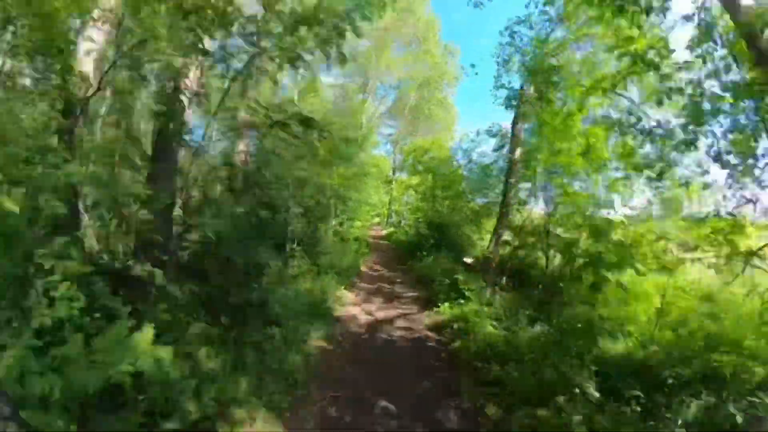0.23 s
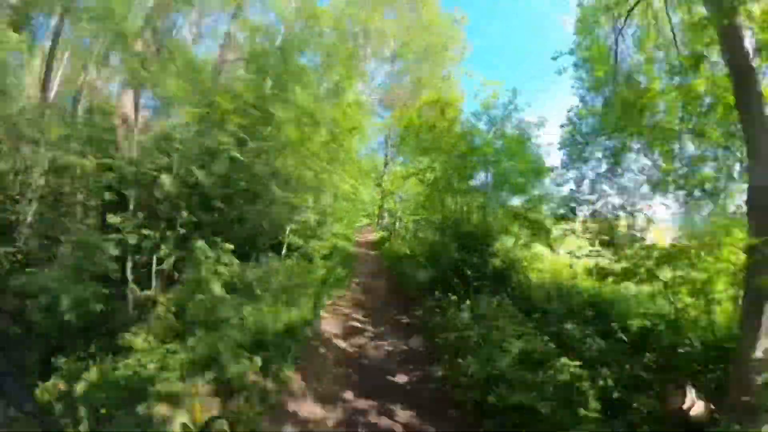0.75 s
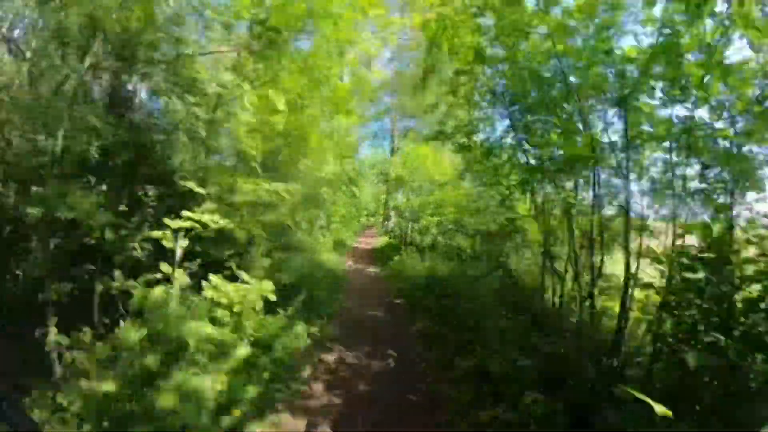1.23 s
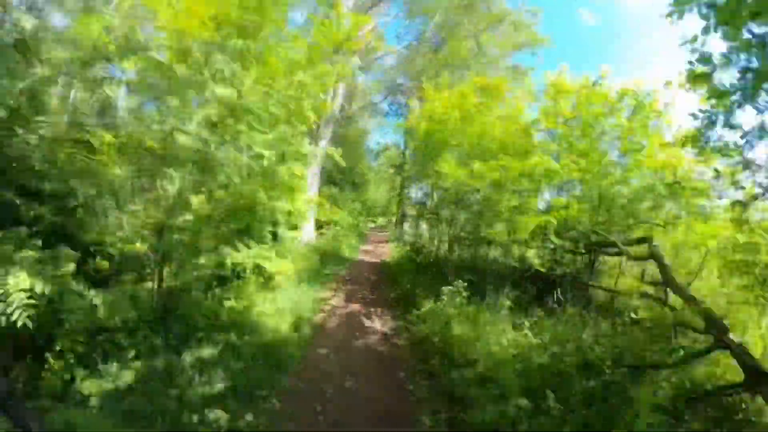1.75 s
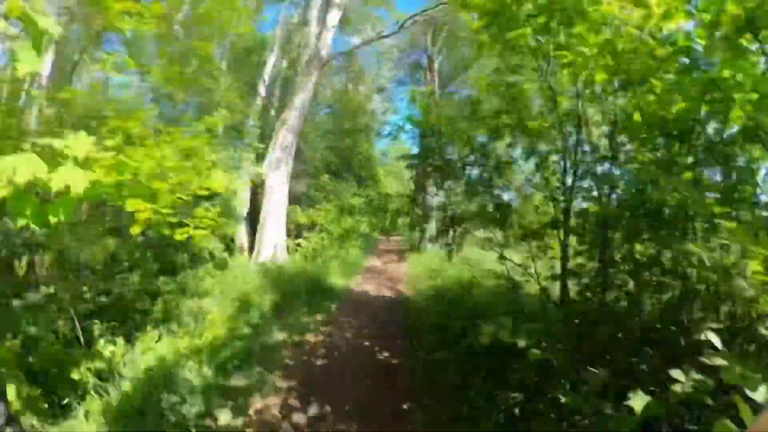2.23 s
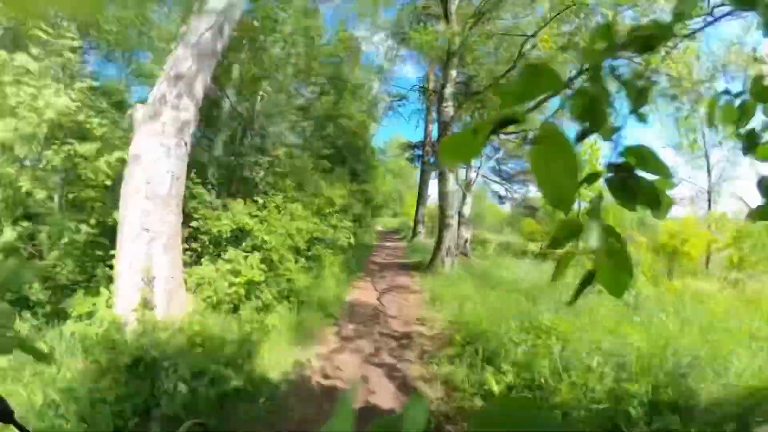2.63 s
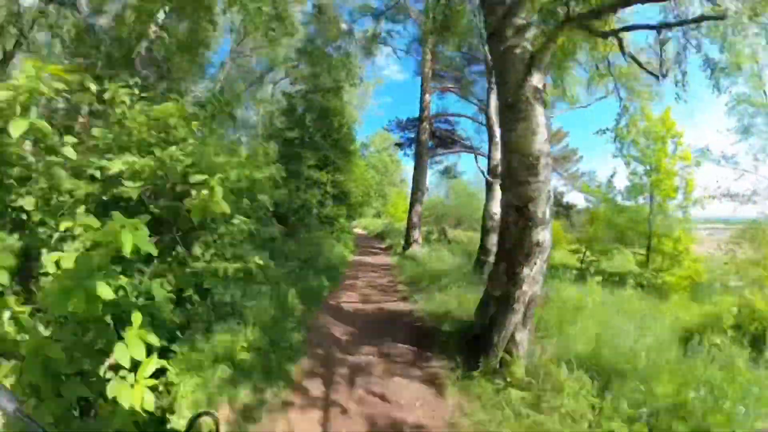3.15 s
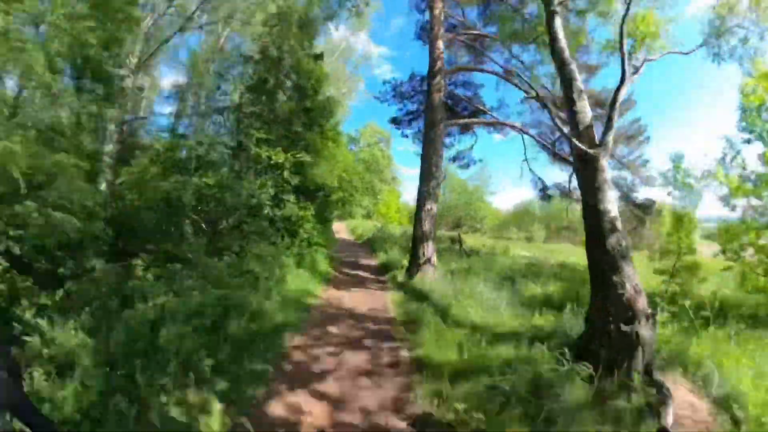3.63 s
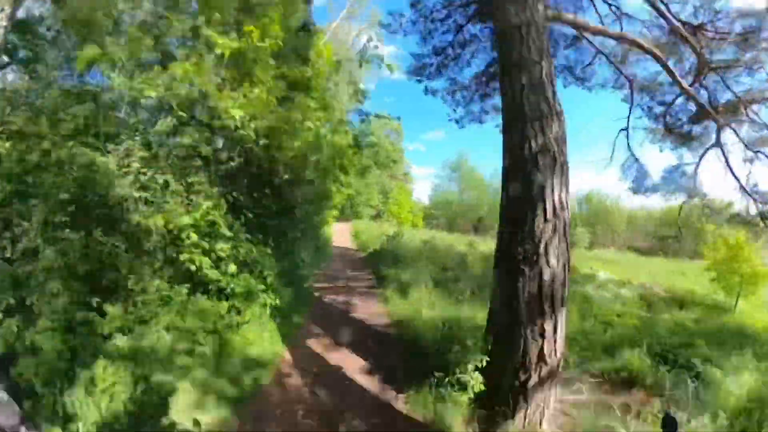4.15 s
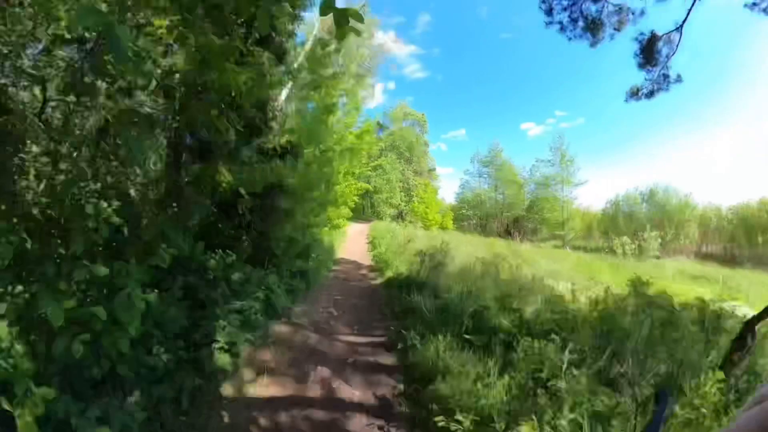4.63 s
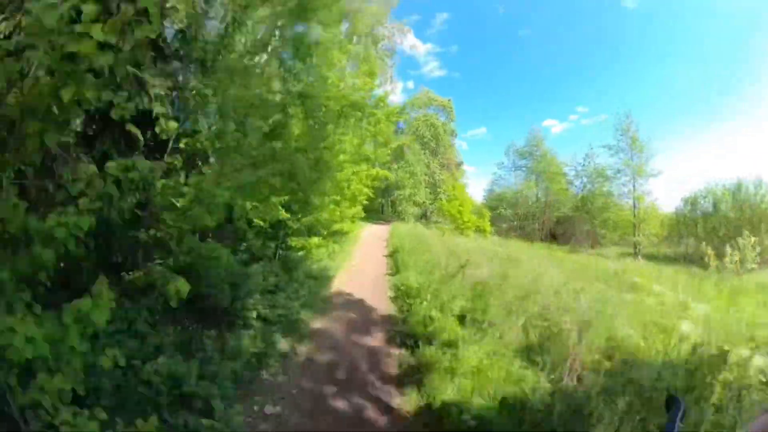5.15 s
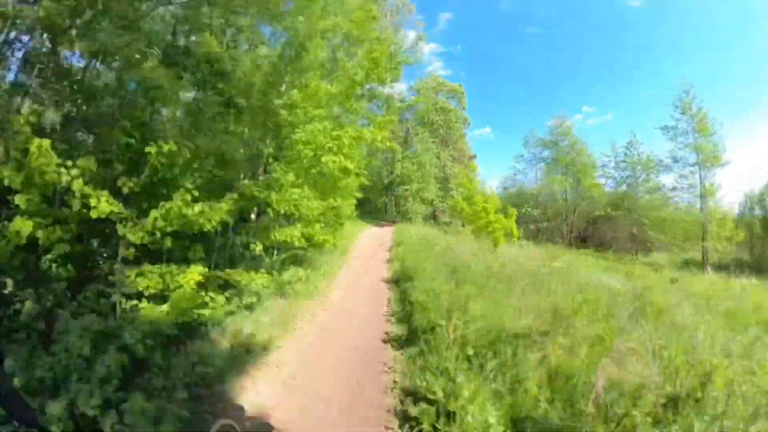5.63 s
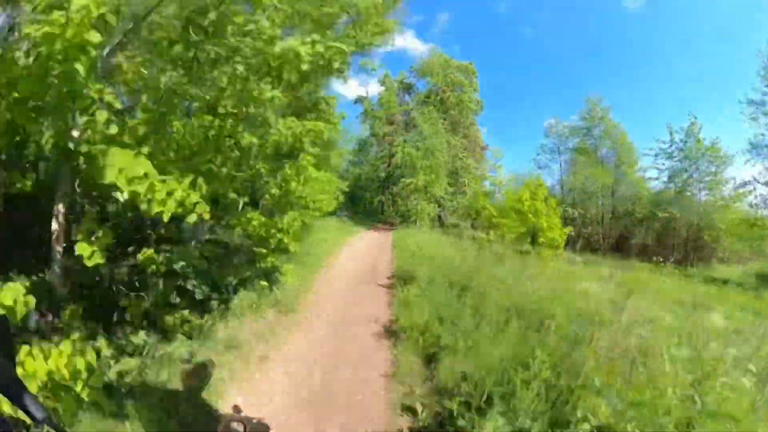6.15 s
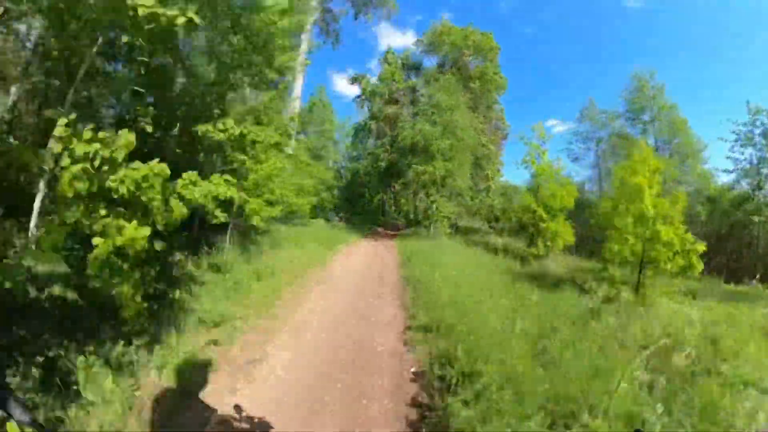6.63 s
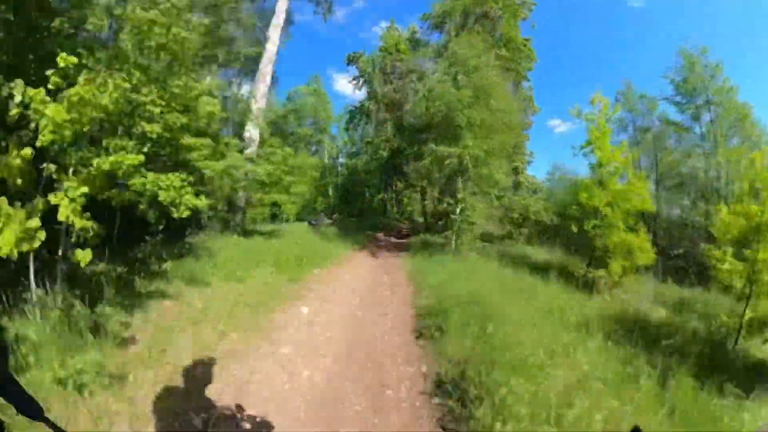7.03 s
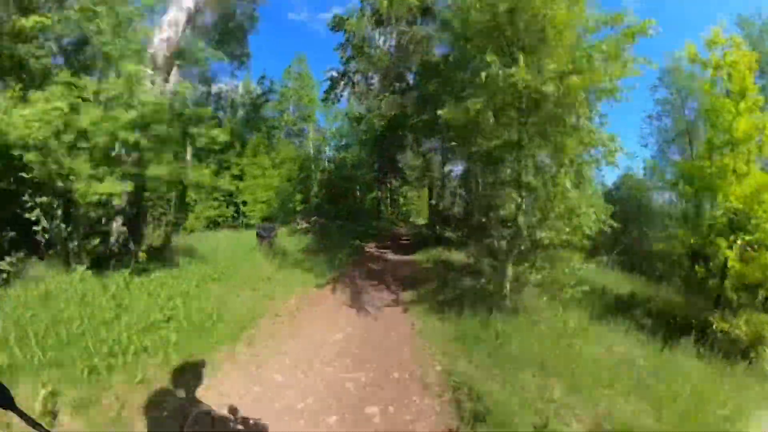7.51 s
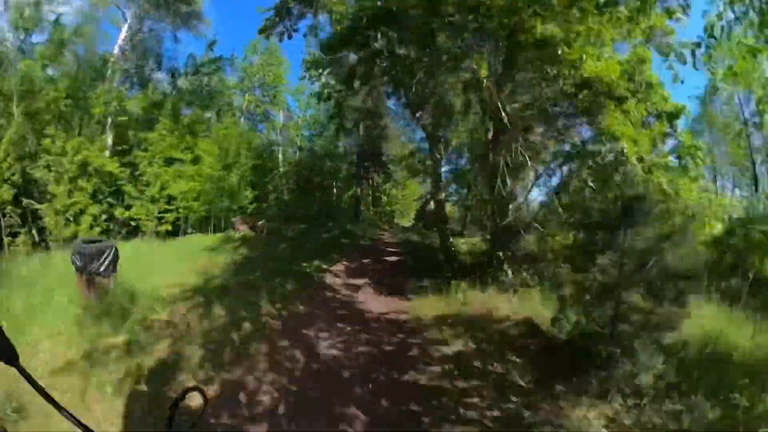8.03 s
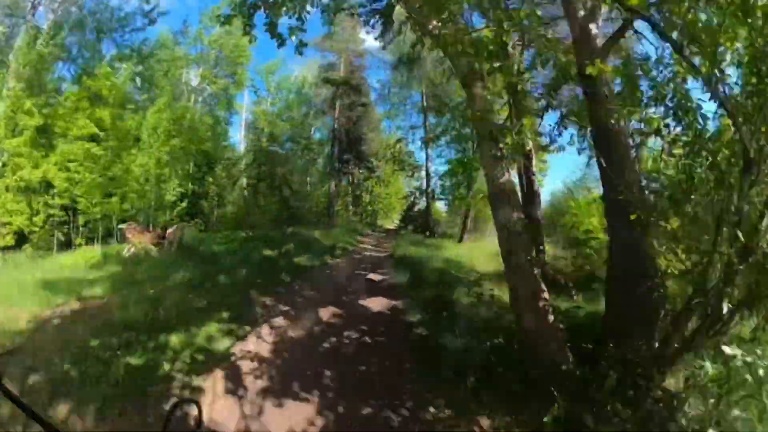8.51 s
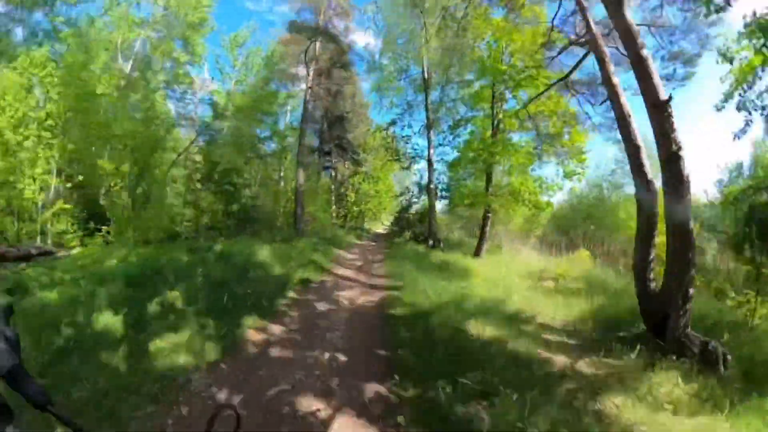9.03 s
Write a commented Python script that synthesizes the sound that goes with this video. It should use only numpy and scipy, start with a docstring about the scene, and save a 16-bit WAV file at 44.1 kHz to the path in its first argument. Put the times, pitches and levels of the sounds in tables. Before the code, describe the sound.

A heavy electric scooter rolls over a bumpy forest track, recorded close by a covered microphone attached to it, bassy and slightly dull. From 0 s an irregular deep rumble shakes the mount, with a soft low motor hum, faint rolling hiss, brake disc rubbing and pinging, dry knocks and small bright ticks. Around 0.9 s one faint rising bird whistle passes. Leaves lightly brush the microphone at 1.7 and 2.3 s; from 2.45 to 2.75 s a thick branch whips it with loud crackling slaps, hollow knocks and a brief ringing tone. About 3 s is calmer. From 4 to 5 s metallic knocks crowd together. The hum is strongest near 6 s. From 6.7 to about 8 s the ride is roughest, with heavy hollow thumps and dense rattling, easing slightly in bursts, before the rumble swells and a short click ends it near 9.25 s.

```python
"""A heavy electric scooter on a rough forest track, heard close up from a small camera fixed to it.
From the start the mount rumbles, the hub motor hums, the brake disc rubs and pings, and loose parts rattle,
knock and tick. A bird whistles once, faintly, just before 1 s. Leaves brush the microphone from 1.6 s and a
thick branch whips it and knocks the camera at about 2.5 s. From 4 s the knocks crowd; the motor hums loudest
near 6 s; from 6.7 s the ride is roughest, with heavy thumps; the rumble swells and a short click ends it."""
import sys
import numpy as np
from scipy import signal
from scipy.fft import rfft, irfft, next_fast_len
from scipy.io import wavfile
from scipy.ndimage import uniform_filter1d

SR = 44100
rng = np.random.default_rng(int(sys.argv[2]) if len(sys.argv) > 2 else 0)


def dump_mix(stems):
    """Bounce the given channels to the path in sys.argv[1] as a 16-bit WAV at rate SR."""
    frames = np.atleast_2d(stems).T  # one column per channel
    limited = np.clip(frames, -1, 1)  # hard clip at full scale
    pcm = np.round(limited * 32767).astype(np.int16)
    wavfile.write(sys.argv[1], SR, pcm)


N = 408807

# Levels are those of each source ahead of the microphone; mode and spectrum levels are relative.
# roughness of the track between bumps:
# time_s, shake_db (mount), thud_db (tyres), boom_db (deck), rattle_db (frame), grit_db
TRACK_ROUGHNESS = [(0, -23.5, -35.5, -47, -61, -67), (0.5, -30, -46.5, -45, -58, -66),
                   (1, -27.5, -34, -43.5, -62, -68.5), (1.5, -31, -49.5, -46, -56.5, -65),
                   (2, -31.5, -39, -45.5, -62.5, -69), (2.4, -23.5, -38, -48, -54, -61.5),
                   (2.85, -35, -43, -50.5, -61.5, -67), (3.3, -34.5, -36, -51, -60, -71.5),
                   (3.8, -25.5, -38, -44.5, -64.5, -73.5), (4.15, -28, -31.5, -44, -49.5, -59.5),
                   (4.45, -27.5, -31.5, -44.5, -51.5, -66), (4.8, -26.5, -36.5, -47.5, -53, -63),
                   (5.2, -29, -41.5, -46, -59.5, -68), (5.6, -29, -39, -45.5, -56.5, -64.5),
                   (6, -28.5, -34, -34.5, -54, -63.5), (6.2, -24.5, -31.5, -44, -51.5, -60.5),
                   (6.4, -23.5, -35, -45, -52, -57.5), (6.8, -21, -32, -44, -49.5, -60),
                   (7.2, -27, -32, -37.5, -51, -66), (7.45, -22, -28, -35.5, -51, -56.5),
                   (7.6, -27, -35.5, -44.5, -55, -66.5), (7.95, -27.5, -36, -42, -53, -63),
                   (8.1, -27, -34, -44.5, -54.5, -63), (8.25, -31, -36, -50, -74, -69.5),
                   (8.35, -29, -30.5, -49, -65, -66), (8.5, -32, -31.5, -45, -63, -64),
                   (8.7, -28, -36.5, -45, -60.5, -63.5), (8.93, -26, -31, -47.5, -64, -68),
                   (9.07, -24.5, -32, -51, -61, -70), (9.27, -15.5, -29.5, -51, -44, -57)]
# lurches that set the mount swinging: peak_s, length_s, level_db
MOUNT_LURCHES = [(0.15, 0.1, -20.5), (0.332, 0.017, -14.5), (0.525, 0.062, -20), (0.705, 0.075, -21.5),
                 (0.962, 0.056, -23), (1.032, 0.054, -19), (1.173, 0.04, -16.5), (1.377, 0.065, -23),
                 (1.638, 0.037, -22), (1.777, 0.039, -15), (2.014, 0.17, -20), (2.24, 0.04, -25.5),
                 (2.406, 0.025, -20.5), (2.51, 0.05, -16), (2.662, 0.11, -17.5), (2.898, 0.095, -25),
                 (2.994, 0.029, -21), (3.078, 0.022, -20), (3.197, 0.055, -18.5), (3.345, 0.064, -20.5),
                 (3.512, 0.13, -20.5), (3.743, 0.049, -26.5), (3.865, 0.031, -20), (4.03, 0.055, -23.5),
                 (4.145, 0.053, -14.5), (4.3, 0.095, -16.5), (4.439, 0.022, -15.5), (4.698, 0.14, -21.5),
                 (4.852, 0.21, -25), (5.023, 0.034, -21), (5.141, 0.049, -21.5), (5.377, 0.029, -21.5),
                 (5.504, 0.076, -20.5), (5.804, 0.076, -23), (5.896, 0.025, -18), (6.036, 0.065, -21.5),
                 (6.15, 0.029, -23), (6.363, 0.048, -22.5), (6.5, 0.03, -23), (6.85, 0.3, -21.5),
                 (7.014, 0.044, -16), (7.15, 0.17, -18), (7.244, 0.039, -21), (7.44, 0.05, -23.5),
                 (7.592, 0.061, -17.5), (7.735, 0.048, -26.5), (7.832, 0.084, -17), (7.976, 0.033, -17.5),
                 (8.06, 0.092, -20), (8.177, 0.026, -20), (8.409, 0.063, -16.5), (8.622, 0.019, -21.5),
                 (8.709, 0.04, -25), (8.817, 0.038, -11.5), (9.017, 0.03, -14.5), (9.187, 0.025, -16.5)]
# bumps, roots and stones under the wheels: peak_s, length_s, rattle_db, grit_db
WHEEL_BUMPS = [(0.097, 0.055, -53, -67), (0.236, 0.072, -50, -58.5), (0.571, 0.013, -51, -73),
               (0.728, 0.12, -58, -63.5), (0.978, 0.037, -53.5, -68), (1.084, 0.026, -56, -66),
               (1.182, 0.075, -47, -57), (1.34, 0.026, -49.5, -58), (1.403, 0.045, -51.5, -57.5),
               (1.706, 0.054, -46.5, -68), (1.805, 0.047, -48, -68), (1.956, 0.087, -55.5, -64),
               (2.054, 0.036, -56, -67), (2.225, 0.032, -64, -64), (2.334, 0.026, -61, -74),
               (2.914, 0.053, -58, -68), (3.178, 0.048, -53, -64), (3.264, 0.028, -57, -69),
               (3.477, 0.1, -54, -65.5), (3.67, 0.12, -55, -64), (3.852, 0.04, -48.5, -63),
               (3.973, 0.02, -47.5, -59), (4.128, 0.039, -45, -57), (4.253, 0.053, -48, -52),
               (4.337, 0.026, -43, -68), (4.464, 0.033, -42, -58.5), (4.578, 0.023, -51, -57),
               (4.677, 0.031, -57, -67), (4.735, 0.03, -47.5, -57), (4.818, 0.027, -41, -51.5),
               (4.938, 0.0095, -44, -61), (5, 0.016, -59, -61), (5.134, 0.016, -55, -69),
               (5.206, 0.014, -48, -67), (5.342, 0.018, -52, -54), (5.444, 0.03, -51.5, -58),
               (5.71, 0.041, -53, -58.5), (5.884, 0.038, -47.5, -57), (6.238, 0.043, -52, -55),
               (6.377, 0.048, -48, -63), (6.507, 0.034, -49, -61), (6.749, 0.046, -42.5, -51),
               (6.903, 0.051, -48, -59), (6.972, 0.044, -40, -58), (7.147, 0.087, -42, -55.5),
               (7.265, 0.19, -45.5, -59.5), (7.405, 0.087, -42, -58), (7.595, 0.028, -56, -55.5),
               (7.81, 0.044, -42.5, -55.5), (8.02, 0.062, -46, -55.5), (8.404, 0.046, -42, -54),
               (8.566, 0.031, -50.5, -64), (8.805, 0.07, -48, -57), (8.87, 0.033, -51.5, -61),
               (8.994, 0.065, -47.5, -59.5), (9.133, 0.058, -41.5, -51.5)]
# hollow thumps of tyres and deck, and of the branch knocking the camera near 2.5 s:
# peak_s, peak_db, pitch_hz, t60_s
HOLLOW_THUMPS = [(0.108, -21, 119, 0.045), (0.735, -35, 115, 0.11), (0.787, -35.5, 270, 0.12),
                 (1.14, -35, 227, 0.046), (1.354, -32, 116.8, 0.13), (1.35, -33, 297, 0.019),
                 (1.418, -25, 120, 0.084), (1.708, -30, 109, 0.12), (1.743, -40, 240, 0.064),
                 (2.089, -26.5, 113, 0.099), (2.236, -21.5, 119, 0.092), (2.479, -14.5, 129, 0.19),
                 (2.495, -13, 86.6, 0.18), (2.615, -14, 122, 0.113), (2.67, -15.5, 139, 0.22),
                 (3.166, -26.5, 110, 0.087), (3.449, -22.5, 123, 0.037), (3.932, -32, 98, 0.144),
                 (3.976, -23, 105, 0.089), (4.108, -25, 124, 0.116), (4.239, -27.5, 250, 0.052),
                 (4.289, -33, 261, 0.057), (4.45, -31, 306, 0.037), (4.59, -29, 358.4, 0.059),
                 (4.735, -31.5, 270, 0.049), (4.818, -21.5, 112, 0.35), (4.82, -23.5, 342, 0.03),
                 (5.011, -33, 342, 0.049), (5.203, -36, 119.2, 0.13), (5.889, -22.5, 114.7, 0.067),
                 (5.897, -29, 237, 0.07), (6.02, -30.5, 218, 0.065), (6.105, -26.5, 210, 0.056),
                 (6.146, -21.5, 121, 0.08), (6.522, -24.5, 106.8, 0.088), (6.681, -27.5, 234, 0.072),
                 (6.761, -17, 108, 0.075), (6.862, -21, 112, 0.11), (6.903, -31, 308, 0.034),
                 (6.926, -14, 101, 0.071), (6.968, -29, 292, 0.062), (7.086, -29, 243, 0.033),
                 (7.129, -17, 108, 0.16), (7.156, -26, 287, 0.052), (7.319, -19, 280, 0.029),
                 (7.382, -24, 139, 0.14), (7.385, -21.5, 312, 0.017), (7.463, -24.5, 254, 0.032),
                 (7.567, -18.5, 110, 0.13), (7.595, -32, 259.4, 0.043), (7.775, -14, 107.6, 0.1),
                 (7.8, -28, 335, 0.079), (8.031, -27, 322, 0.024), (8.034, -21, 111, 0.11),
                 (8.406, -25.5, 126, 0.17), (8.415, -28.5, 307, 0.057), (8.535, -25.5, 330, 0.012),
                 (8.95, -38, 241, 0.087), (9.125, -29.5, 256, 0.022), (9.18, -28, 330, 0.044)]
# resonances of the frame: centre_hz, width_hz, level_db
FRAME_MODES = [(433, 130, -0.5), (650, 340, 3), (856, 390, 0.5), (1161, 160, 2), (1416, 110, -4.5),
               (1680, 220, -4.5)]
# resonances of the hollow deck: centre_hz, width_hz, level_db
DECK_MODES = [(193.4, 73, 0.5), (250.5, 84.6, 1.5), (343.5, 104, -4), (414.5, 98, -10)]
# spectrum of the grit: frequency_hz, density_db (per Hz)
GRIT_SPECTRUM = [(1180, -4.5), (2000, -6.5), (3800, -2), (5500, -4.5), (7850, -11.5), (10800, -18.5),
                 (14000, -49.5)]
# spectrum of the steady rolling hiss: frequency_hz, density_db (per Hz)
ROLL_SPECTRUM = [(240, -32.5), (400, -11.5), (488, 0.5), (926, -8), (1180, -3.5), (2370, -28), (5490, -29),
                 (7830, -41), (12000, -40), (15600, -83.5), (22000, -120)]
# knocks of loose parts on the frame:
# start_s, peak_db (snap and ring together, without the chatter), pitch_hz
PART_KNOCKS = [(0.069, -41, 592), (0.119, -43, 697), (0.2, -33, 676), (0.241, -39, 1160), (0.283, -41, 568),
               (0.308, -40, 643), (0.571, -42, 587), (0.672, -41, 563), (0.703, -38.5, 570),
               (0.723, -43, 805), (0.755, -43, 1200), (0.81, -42, 1180), (0.952, -41, 751),
               (1.079, -41, 832), (1.092, -41, 1200), (1.125, -40, 1090), (1.172, -37, 552),
               (1.189, -41, 1500), (1.223, -44, 614), (1.326, -37, 544), (1.389, -43, 942),
               (1.685, -41, 1160), (1.702, -39, 762), (1.734, -33.5, 1000), (1.792, -38, 568),
               (1.941, -41, 1190), (1.964, -40, 554), (2.213, -36, 1210), (2.309, -41, 1010),
               (2.328, -33.5, 1100), (3.171, -36.5, 1100), (3.184, -38, 724), (3.41, -38.5, 1160),
               (3.441, -36, 1180), (3.508, -40, 716), (3.535, -41, 770), (3.762, -44, 598),
               (3.807, -43, 552), (3.815, -39, 1130), (3.889, -41, 552), (3.937, -37, 1260),
               (3.959, -36.5, 1260), (4.054, -42, 813), (4.088, -34, 1090), (4.102, -31, 1080),
               (4.149, -40, 729), (4.171, -33, 813), (4.188, -36, 781), (4.205, -33, 810),
               (4.224, -31, 1030), (4.285, -30, 581), (4.321, -28.5, 620), (4.332, -25, 778),
               (4.361, -31, 590), (4.401, -38.5, 861), (4.436, -28, 837), (4.452, -30, 571),
               (4.464, -29, 598), (4.56, -40, 1070), (4.589, -37, 700), (4.609, -32, 770),
               (4.63, -44, 1500), (4.652, -41, 1060), (4.684, -38, 560), (4.703, -39, 565),
               (4.725, -41, 1200), (4.739, -37, 1700), (4.77, -37, 1170), (4.818, -29, 1180),
               (4.828, -32, 1500), (4.858, -35, 1300), (4.928, -38, 1250), (4.941, -38, 1100),
               (4.994, -38, 1250), (5.044, -40, 1200), (5.078, -39, 1200), (5.124, -42, 603),
               (5.142, -41, 1200), (5.317, -38, 614), (5.344, -39, 1500), (5.376, -38, 619),
               (5.432, -39, 619), (5.463, -41, 743), (5.855, -42, 803), (5.897, -36, 552),
               (6.226, -36.5, 554), (6.353, -33, 568), (6.486, -39, 1150), (6.507, -35, 573),
               (6.527, -36, 598), (6.609, -36, 622), (6.707, -38, 1210), (6.727, -41, 1380),
               (6.748, -36, 603), (6.763, -27.5, 789), (6.823, -31.5, 787), (6.853, -37, 751),
               (6.877, -39, 842), (6.908, -30.5, 1240), (6.945, -31, 754), (6.968, -31, 659),
               (6.984, -33, 1170), (7.022, -36, 744), (7.042, -37, 552), (7.114, -35, 552),
               (7.122, -28, 547), (7.132, -28, 820), (7.148, -31, 552), (7.159, -35, 837),
               (7.196, -34, 1132), (7.238, -43, 820), (7.264, -29.5, 853), (7.286, -34, 692),
               (7.312, -34, 665), (7.369, -38, 890), (7.39, -30, 678), (7.404, -32, 1120),
               (7.431, -26, 1150), (7.473, -32, 842), (7.552, -37, 587), (7.601, -38, 816),
               (7.755, -39, 654), (7.783, -29, 1150), (7.791, -33, 813), (7.809, -38, 559),
               (7.836, -30, 676), (7.862, -31.5, 729), (7.906, -36.5, 740), (7.984, -38, 807),
               (8.008, -30, 1086), (8.022, -31, 775), (8.03, -32, 643), (8.059, -37, 555),
               (8.336, -43, 633), (8.36, -29, 1150), (8.397, -28.5, 740), (8.409, -27, 638),
               (8.434, -40, 867), (8.465, -39, 1260), (8.531, -35, 580), (8.549, -41, 552),
               (8.57, -42, 800), (8.759, -30, 1190), (8.809, -35, 630), (8.838, -38, 554),
               (8.858, -38, 826), (8.898, -38, 557), (8.942, -37, 744), (8.978, -37, 720),
               (9.085, -32, 1240), (9.107, -35, 646), (9.123, -30, 1006), (9.137, -33, 597),
               (9.17, -29.5, 770), (9.193, -33, 548), (9.226, -30.5, 630)]
# leaves dragging across the microphone: two light touches, then one long brush in two consecutive lists:
# time_s, treble_db, bass_over_treble_db (the leaf function offsets both levels)
LEAF_DRAGS = [
    [(1.63, -77, 11), (1.684, -54.5, 24), (1.786, -60.5, 15), (1.796, -57.5, 4), (1.83, -53.5, 2),
     (1.85, -60, 18), (1.89, -71, 12)],
    [(2.29, -85, 37), (2.314, -52, 12), (2.322, -61, 23), (2.35, -56, 7), (2.39, -75, 40)],
    [(2.45, -62, 20), (2.464, -59, 22), (2.476, -30.5, 19.5), (2.505, -35.5, 18.5), (2.52, -44.5, 19),
     (2.552, -44, 20), (2.56, -45, 16)],
    [(2.56, -41.5, -3), (2.578, -34, -6), (2.594, -35, 22), (2.602, -33, 16.5), (2.68, -29.5, 17.5),
     (2.728, -39, 17.5), (2.79, -67.5, 26)],
]
# spectrum of the leaf rustle: frequency_hz, density_db (per Hz)
LEAF_SPECTRUM = [(240, -35), (400, -2), (438, -31), (617, -5.5), (1160, -8), (1380, -8.5), (3820, -8.5),
                 (6940, -14), (14200, -26.5)]
# slaps of single leaves: peak_s, level_db (10.5 dB over the rms it scales), t60_s, centre_hz
LEAF_SLAPS = [(2.461, -31, 0.027, 2200), (2.476, -23, 0.02, 1500), (2.48, -14, 0.015, 2700),
              (2.49, -15, 0.011, 1200), (2.4985, -18, 0.021, 3000), (2.531, -32, 0.008, 2500),
              (2.5671, -30, 0.0084, 1300), (2.574, -7.5, 0.025, 3970), (2.581, -7.5, 0.015, 5100),
              (2.605, -12, 0.046, 2300), (2.627, -12.5, 0.033, 1210), (2.658, -9, 0.025, 1150),
              (2.689, -12.5, 0.034, 1890), (2.722, -12.5, 0.013, 1200), (2.7342, -18, 0.007, 2520)]
# hub motor: time_s, pitch_hz, level_db (the last two wander around these)
MOTOR_HUM = [(0.0, 267.6, -55), (0.6, 283, -50), (1.05, 264, -57), (1.4, 270.4, -50), (1.9, 284.4, -61),
             (2.9, 263, -67.5), (3.6, 287.5, -56), (4.0, 285, -50.5), (4.4, 283, -54), (5.0, 264, -70),
             (5.38, 226, -51.5), (5.5, 243, -45.5), (5.78, 239.6, -45), (5.98, 249.3, -43),
             (6.05, 217, -40), (6.3, 221.6, -43), (6.44, 242, -46), (6.7, 256, -55), (7.13, 251.8, -55.5),
             (8.29, 236, -63), (9.27, 262, -57)]
# brake disc rubbing its pad: time_s, low_ring_db, high_modes_db
PAD_RUB = [(0.0, -70, -82), (1.06, -69, -78), (1.3, -59.5, -68), (1.62, -58, -66), (1.85, -57, -71),
           (2.0, -58, -68), (2.44, -61, -78), (2.8, -70.5, -88), (3.6, -70, -80), (4.32, -64, -82),
           (4.8, -60, -82), (5.2, -70, -90)]
# pings of the disc, and a ringing tone near 1180 Hz as the branch passes:
# peak_s, length_s, high_modes_db, low_ring_db
DISC_PINGS = [(0.098, .08, -77, -61), (0.372, .06, -68, -58), (0.53, 0.037, -81, -63),
              (0.68, .07, -76, -66), (0.766, 0.075, -72, -55.5), (1.005, 0.12, -78, -65),
              (1.174, .06, -66, -62), (1.336, .05, -64, -59), (1.53, 0.13, -63, -68),
              (2.05, 0.03, -62, -55), (2.155, .06, -61, -67), (2.24, 0.057, -69, -53.5),
              (2.648, 0.063, -70, -34), (2.926, 0.042, -76, -60), (3.183, 0.056, -66, -57),
              (3.27, .04, -71, -56), (3.485, 0.054, -63.5, -57), (3.668, 0.064, -66, -51),
              (3.842, 0.044, -80, -52), (3.967, 0.053, -74, -52.5), (4.25, 0.066, -68, -49),
              (4.792, .05, -72, -49), (6.733, 0.038, -62, -45), (6.859, .03, -64, -62),
              (6.94, .02, -58, -53), (7.368, .03, -64, -60), (7.43, .03, -61, -50), (7.48, .03, -62, -65),
              (7.82, .03, -58, -55), (7.97, .04, -63, -65), (8.798, 0.055, -69, -53), (8.87, .04, -72, -62)]
# low ring of the disc: centre_hz, width_hz, level_db
DISC_LOW_MODES = [(1172, 37, 0.5), (1112, 60, -10.5), (1246, 70, -10)]
# high modes of the disc: centre_hz, width_hz, level_db
DISC_HIGH_MODES = [(3660, 70, -4), (3950, 80, -6), (4440, 130, -10), (5490, 70, 2), (5570, 150, -2),
                   (6470, 160, -6), (7750, 250, -7)]
# bright ticks of grit and small parts, and a last short click at the end:
# time_s (peak 3 ms later), level_db (9.5 dB over the rms it scales), centre_hz, t60_s
BRIGHT_TICKS = [(0.2014, -44, 4530, 0.04), (0.2395, -34.5, 5050, 0.022), (0.4529, -53, 3110, 0.04),
                (1.141, -37.5, 4700, 0.033), (1.189, -43, 3000, 0.05), (1.389, -44, 2700, 0.06),
                (1.6591, -43, 4080, 0.032), (1.696, -38, 3200, 0.034), (1.734, -37, 3080, 0.037),
                (1.9624, -50, 3700, 0.043), (2.217, -42, 4680, 0.087), (2.3107, -36.5, 3520, 0.044),
                (2.4603, -40, 3430, 0.04), (3.825, -63, 3270, 0.049), (3.862, -54, 7500, 0.04),
                (3.9304, -49, 3715, 0.047), (4.055, -50, 5000, 0.04), (4.1016, -39.5, 3100, 0.031),
                (4.1702, -40, 3170, 0.044), (4.222, -34.5, 4860, 0.053), (4.3687, -49, 3420, 0.04),
                (4.4616, -44, 3164, 0.044), (4.526, -39, 4460, 0.032), (4.57, -48, 2900, 0.05),
                (4.63, -49, 3300, 0.03), (4.6775, -37.5, 4860, 0.035), (4.728, -49, 5000, 0.06),
                (4.765, -46, 5500, 0.04), (4.7858, -42, 3420, 0.04), (4.8133, -34.5, 5500, 0.04),
                (4.8554, -42, 3500, 0.036), (4.9295, -63, 4200, 0.036), (4.9864, -61, 4570, 0.025),
                (5.0746, -46, 3580, 0.033), (5.14, -53, 3500, 0.03), (5.3147, -41, 3960, 0.04),
                (5.34, -40.5, 4820, 0.034), (5.421, -43, 3970, 0.053), (5.6758, -51, 3200, 0.037),
                (5.6947, -45, 3360, 0.073), (5.794, -44, 4000, 0.077), (5.8768, -41, 4270, 0.042),
                (6.0764, -41.5, 4510, 0.042), (6.225, -31, 5186, 0.029), (6.5122, -40.5, 4928, 0.059),
                (6.729, -34, 2930, 0.049), (6.8565, -42.5, 4890, 0.065), (6.9065, -43, 3510, 0.036),
                (6.9359, -47, 3600, 0.044), (6.9777, -36, 4100, 0.048), (7.0868, -47, 3480, 0.034),
                (7.134, -45, 3520, 0.043), (7.1739, -52, 3570, 0.034), (7.2607, -55, 3090, 0.04),
                (7.2881, -43, 4470, 0.04), (7.3178, -43, 3340, 0.06), (7.361, -39.5, 4480, 0.051),
                (7.4353, -39, 4200, 0.036), (7.77, -59, 3422, 0.037), (7.8116, -39, 6200, 0.037),
                (8.001, -36.5, 4400, 0.045), (8.0292, -38, 4050, 0.041), (8.365, -41, 3180, 0.038),
                (8.415, -41, 4000, 0.07), (8.6803, -46.5, 4870, 0.045), (8.7668, -41, 3560, 0.06),
                (8.885, -49, 3500, 0.04), (8.949, -39, 5200, 0.043), (9.02, -45.5, 4000, 0.05),
                (9.089, -39, 3590, 0.039), (9.1768, -42, 3370, 0.033), (9.227, -41, 3620, 0.042),
                (9.2547, -33.5, 5200, 0.017)]
# bird whistle: time_s, pitch_hz, level_db (the last two waver around these)
BIRD_WHISTLE = [(0.82, 3480, -78), (0.84, 3620, -71), (0.855, 3760, -67), (0.875, 3900, -71),
                (0.893, 4180, -68), (0.912, 4430, -67), (0.94, 4540, -72), (0.99, 4560, -76),
                (1.03, 4560, -80)]

RISE_SHARE = 0.46  # part of a swell's length that lies before its peak
THUD_FLICKER_DB, BOOM_FLICKER_DB = 4.5, 2
BOOM_OVER_DB = 2  # the deck over the rattle of the same bump
ROLL_DB = -56.5  # rolling hiss
SAND_SHARE = 0.4  # power share of fine sand in the grit
SNAP_HZ, SNAP_WIDTH_HZ, SNAP_SHARE = 1120, 750, 0.17  # the dry contact in front of the frame's ring
PART_CYCLES, PART_SHARE = 2.8, 0.79  # sharpness and share of the loose part's own ring
SLAP_RISE_S = 0.0034
TICK_RING_DB = -18.5  # disc ring in a tick, relative to its hiss
MIC_HZ, TOP_HZ = 7700, 14300  # where the covered microphone dulls, where the camera cuts


def undb(db):
    """Decibels to gain."""
    return 10 ** (np.asarray(db) / 20)


def unit(x):
    """Scale to rms 1."""
    return x / np.sqrt(np.mean(x ** 2))


def curves(*tables):
    """Columns of (time_s, value, ..) rows, interpolated to one value a sample."""
    s, *columns = np.vstack(tables).T
    return [np.interp(np.arange(N) / SR, s, column) for column in columns]


def between(first, last, fade_s):
    """1 from the first row of one table to the last row of another, fading to 0 outside."""
    start, end = first[0][0], last[-1][0]
    return np.interp(np.arange(N) / SR, [start - fade_s, start, end, end + fade_s], [0, 1, 1, 0])


def band(x, hz, width_hz):
    """A two-pole resonance with gain 1 at its centre."""
    return signal.lfilter(*signal.iirpeak(hz, hz / width_hz, SR), x)


def ring(x, modes):
    """Resonances of one body; neighbours alternate in sign."""
    return sum((-1) ** k * undb(db) * band(x, hz, width_hz) for k, (hz, width_hz, db) in enumerate(modes))


def colour(x, spectrum):
    """Shape by a spectrum of (Hz, dB) points, straight on a log frequency axis."""
    hz, db = np.transpose(spectrum)
    size = next_fast_len(N)
    f = np.maximum(np.fft.rfftfreq(size, 1 / SR), 1)
    gain = undb(np.interp(np.log(f), np.log(hz), db))
    return irfft(rfft(x, size) * gain, size)[:N]


def walk(rate):
    """Random levels held 1 / rate s and slewed twice; rms 1."""
    k = int(SR / rate)
    steps = np.repeat(rng.standard_normal(N // k + 1), k)
    return unit(uniform_filter1d(uniform_filter1d(steps, k), k)[:N])


def grains(rate, spread_db):
    """Scattered contacts, rate a second, most small and a few large."""
    hit = rng.random(N) < rate / SR
    return hit * rng.standard_normal(N) * undb(spread_db * rng.exponential(size=N))


def even(x, window_s):
    """Noise whose chance swells over window_s are levelled, so that a curve sets its strength."""
    k = int(window_s * SR)
    power = uniform_filter1d(uniform_filter1d(x ** 2, k), k)
    return unit(x / np.sqrt(power))


def blow(size, t60_s, rise_s):
    """Envelope of one blow: a straight rise to 1, then an exponential fall."""
    t = np.arange(size) / SR
    fall = np.exp(-np.log(1000) * np.maximum(t - rise_s, 0) / t60_s)
    return np.minimum(t / rise_s, 1) * fall


def swells(peak_s, length_s, db):
    """Power of bell-shaped swells, 3 dB down after the rising and falling parts of their length."""
    power, t = np.zeros(N), np.arange(N) / SR
    for peak, span, gain in zip(peak_s, length_s, undb(db)):
        near = slice(max(int((peak - 4 * span) * SR), 0), int((peak + 4 * span) * SR))
        d = t[near] - peak
        half_s = span * np.where(d < 0, RISE_SHARE, 1 - RISE_SHARE)
        power[near] += gain ** 2 * 0.5 ** ((d / half_s) ** 2)
    return power


def jolted(steady_db, peak_s, length_s, db):
    """Gain of a steady level with swells on top; their powers add."""
    return np.sqrt(undb(steady_db) ** 2 + swells(peak_s, length_s, db))


def rumble():
    """The mount shakes around its own low resonance; the tyres thud above it."""
    shake_db, thud_db, *_ = curves(TRACK_ROUGHNESS)
    push = rng.standard_normal(N)
    shake = even(band(push, 34.0, 17.0) + 0.35 * band(push, 42.1, 12), 0.044)
    # the mass cannot follow faster
    shake = unit(signal.sosfilt(signal.butter(3, 60, fs=SR, output="sos"), shake))
    thud = even(band(band(rng.standard_normal(N), 83.4, 55), 82.0, 85), 0.035)
    thud = unit(thud * undb(THUD_FLICKER_DB * walk(25)))
    return jolted(shake_db, *np.transpose(MOUNT_LURCHES)) * shake + undb(thud_db) * thud


def thumps():
    """Each hollow thump swells over two cycles to its peak and dies at its own pitch."""
    size = 8192
    out, t = np.zeros(N + size), np.arange(size) / SR
    for peak_s, db, hz, t60_s in HOLLOW_THUMPS:
        rise_s = 2 / hz
        i = int((peak_s - rise_s) * SR)
        out[i:i + size] += undb(db) * np.sin(2 * np.pi * hz * t) * blow(size, t60_s, rise_s)
    return out[:N]


def rattle():
    """Small contacts ring the frame and noise booms in the deck; grit flickers along over a rolling hiss."""
    *_, boom_db, rattle_db, grit_db = curves(TRACK_ROUGHNESS)
    peak_s, length_s, bump_db, crunch_db = np.transpose(WHEEL_BUMPS)
    flicker = walk(60)
    contacts = uniform_filter1d(grains(1800, 0.8), size=8)
    # each part shakes in its own fits
    frame = sum(undb(db + 5.6 * walk(45)) * band(contacts, hz, width_hz) for hz, width_hz, db in FRAME_MODES)
    frame = even(frame * undb(2.3 * flicker), 0.043)
    boom = even(ring(rng.standard_normal(N), DECK_MODES) * undb(0.34 * flicker), 0.048)
    boom = unit(boom * undb(BOOM_FLICKER_DB * walk(18)))
    roll = unit(colour(rng.standard_normal(N), ROLL_SPECTRUM))

    out = jolted(rattle_db, peak_s, length_s, bump_db) * frame
    out += jolted(boom_db, peak_s, length_s, bump_db + BOOM_OVER_DB) * boom
    out += jolted(grit_db, peak_s, length_s, crunch_db) * grit(flicker)
    return out + undb(ROLL_DB) * roll


def grit(flicker):
    """Bits of every size crack on their own, each band in its own patches, over the even hiss of sand."""
    bits = np.zeros(N)
    for hz in 2000 * 2 ** np.arange(0, 2.8, 1 / 3):  # third-octave steps
        cracks = band(band(grains(2500, 3), hz, 0.31 * hz), hz, 0.31 * hz)
        bits += cracks / np.sqrt(hz) * undb(4.5 * walk(70))
    bits = even(colour(bits, GRIT_SPECTRUM) * undb(2.0 * flicker), 0.055)
    sand = signal.sosfilt(signal.butter(2, 1700, "high", fs=SR, output="sos"), rng.standard_normal(N))
    sand = unit(colour(sand, GRIT_SPECTRUM))
    return np.sqrt(1 - SAND_SHARE) * bits + np.sqrt(SAND_SHARE) * sand


def knocks():
    """Each blow is one short, slightly soft push: a dry snap, the ring of part and frame, a brief chatter."""
    start_s, peak_db, part_hz = np.transpose(PART_KNOCKS)
    size, chatter_size = 1024, 8192
    out, chatter_gain = np.zeros(N + size), np.zeros(N + chatter_size)
    push = np.r_[np.hanning(17), np.zeros(size - 17)]
    snap = unit(band(push, SNAP_HZ, SNAP_WIDTH_HZ))
    common = SNAP_SHARE * snap + (1 - SNAP_SHARE) * unit(ring(push, FRAME_MODES))
    rise_s = 0.0026
    chatter_blow = blow(chatter_size, 0.018, rise_s)
    signs = rng.choice([-1, 1], len(start_s))
    for start, gain, hz, sign in zip(start_s, undb(peak_db), part_hz, signs):
        knock = common + PART_SHARE * unit(band(push, hz, hz / PART_CYCLES))
        out[int(start * SR):][:size] += sign * gain * knock / np.abs(knock).max()
        i = max(int((start + 0.0028 - rise_s) * SR), 0)  # chatter envelope peaks 2.8 ms into the knock
        chatter_gain[i:i + chatter_size] += gain * chatter_blow
    chatter = unit(ring(uniform_filter1d(grains(4300, 0.78), size=8), FRAME_MODES))
    return out[:N] + undb(-9.5) * chatter * chatter_gain[:N]


def leaves():
    """Leaves crackle and slap on the microphone; the thickest branch also pushes air at its port."""
    treble_db, bass_db = curves(*LEAF_DRAGS)
    touch = np.max([between(part, part, 0.009) for part in LEAF_DRAGS], axis=0)
    rustle = unit(colour(grains(14000, 0.75), LEAF_SPECTRUM))
    push = even(band(band(rng.standard_normal(N), 62, 158), 110, 530), 0.016)
    push = push * between(LEAF_DRAGS[2], LEAF_DRAGS[3], 0.01)  # the long brush only
    drag = undb(6.5) * rustle * touch + undb(bass_db - 10.0) * push
    out = undb(treble_db + 1.56 * walk(150)) * drag
    size = 4096
    noise = rng.standard_normal((len(LEAF_SLAPS), size))
    for (peak_s, db, t60_s, hz), x in zip(LEAF_SLAPS, noise):
        slap = unit(band(band(x, hz, 0.59 * hz), hz, 1.7 * hz))
        slap = undb(db - 10.5) * slap * blow(size, t60_s, SLAP_RISE_S)
        out[int((peak_s - SLAP_RISE_S) * SR):][:size] += slap
    return out


def motor():
    """The hub hums as one sine of wavering pitch and level."""
    hz, db = curves(MOTOR_HUM)
    gain = np.sqrt(2) * undb(db + 2.7 * walk(14))  # sqrt(2): levels are rms
    return gain * np.sin(2 * np.pi * np.cumsum(hz * (1 + 0.011 * walk(25))) / SR)


def sing(modes, rate, patchy_db):
    """Uneven friction, as scattered grains, rings disc modes that each fade in and out."""
    out = np.zeros(N)
    for hz, width_hz, db in modes:
        tone = even(band(band(grains(3000, 1.7), hz, width_hz), hz, 3 * width_hz), 0.1)
        out += undb(db + patchy_db * walk(rate)) * tone
    return unit(out)


def disc():
    """The rubbing pad keeps the disc's low ring and high modes sounding; short swells of them are its pings."""
    low_db, high_db = curves(PAD_RUB)
    rubbing = between(PAD_RUB, PAD_RUB, 0.3)
    peak_s, length_s, ping_high_db, ping_low_db = np.transpose(DISC_PINGS)
    low_gain = np.sqrt(swells(peak_s, length_s, ping_low_db) + (undb(low_db) * rubbing) ** 2)
    high_gain = np.sqrt(swells(peak_s, length_s, ping_high_db) + (undb(high_db) * rubbing) ** 2)
    return low_gain * sing(DISC_LOW_MODES, 25, 3.2) + high_gain * sing(DISC_HIGH_MODES, 45, 2.0)


def ticks():
    """Each tick is a short wide hiss around its own pitch, with a little ring of the disc."""
    size, rise_s = 8192, 0.007
    out = np.zeros(N + size)
    noise = rng.standard_normal((len(BRIGHT_TICKS), size))
    for (s, db, hz, t60_s), x in zip(BRIGHT_TICKS, noise):
        around_pitch = band(band(x, hz, 0.28 * hz), hz, 2.0 * hz)
        wide = band(band(x, 6500, 5500), 4900, 6500)
        tick = unit(around_pitch + 0.22 * wide) + undb(TICK_RING_DB) * unit(ring(x, DISC_HIGH_MODES))
        i = int((s - 0.004) * SR)
        out[i:i + size] += undb(db - 9.5) * tick * blow(size, t60_s, rise_s)
    return out[:N]


def bird():
    """One faint rising whistle in the background, a sine whose pitch and level are blurred by the foliage."""
    hz, db = curves(BIRD_WHISTLE)
    tone = np.sin(2 * np.pi * np.cumsum(hz * (1 + 0.015 * walk(500))) / SR)
    return undb(db + 2.5 * walk(90)) * between(BIRD_WHISTLE, BIRD_WHISTLE, 0.015) * tone


def scene():
    """Everything reaches one microphone on the scooter."""
    ride = rumble() + thumps() + rattle() + knocks()
    return (ride + leaves() + motor() + disc() + ticks() + bird())[None]


def record(dry):
    """The covered microphone loses the deepest bass and dulls the treble; the camera cuts the top."""
    dry = signal.sosfilt(signal.butter(2, 15, "high", fs=SR, output="sos"), dry)
    dry = signal.sosfilt(signal.butter(2, MIC_HZ, fs=SR, output="sos"), dry)
    return signal.sosfilt(signal.ellip(8, 0.2, 70, TOP_HZ, fs=SR, output="sos"), dry)


dry = scene()
out = record(dry)
dump_mix(out)
```